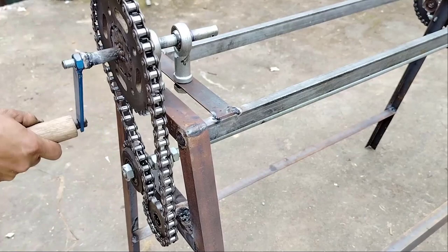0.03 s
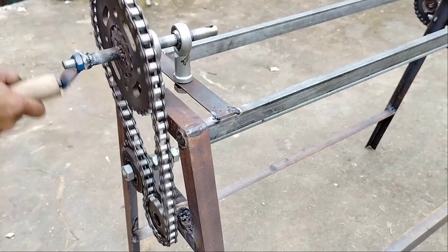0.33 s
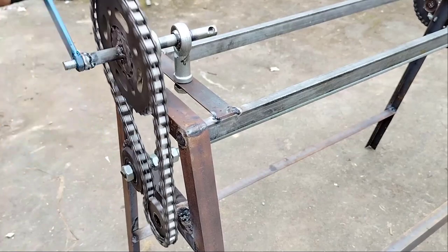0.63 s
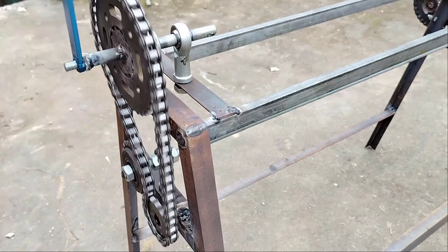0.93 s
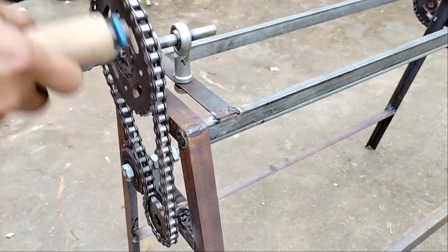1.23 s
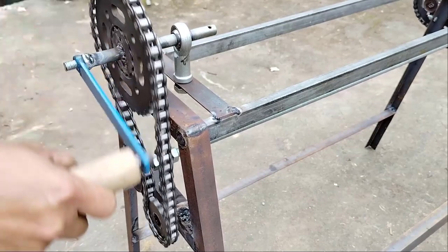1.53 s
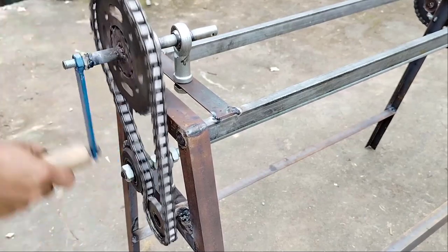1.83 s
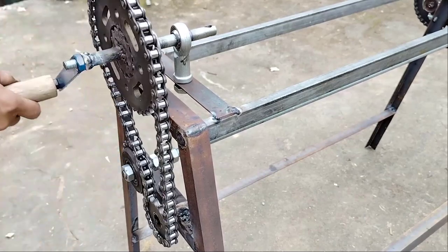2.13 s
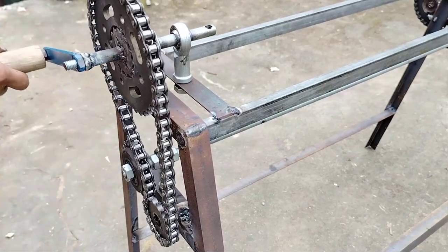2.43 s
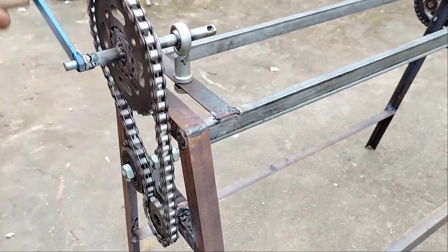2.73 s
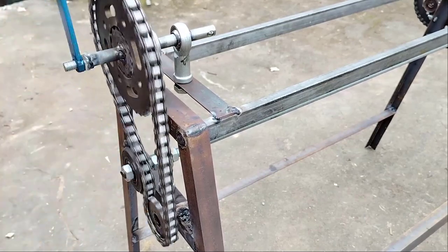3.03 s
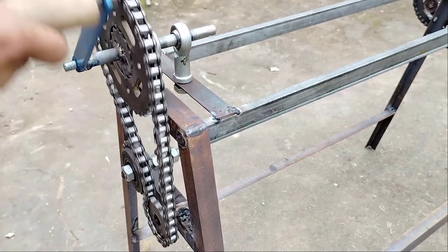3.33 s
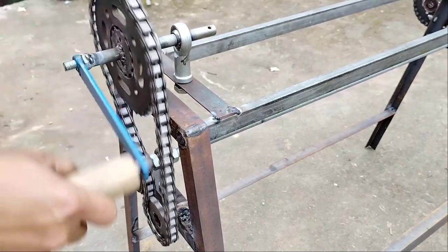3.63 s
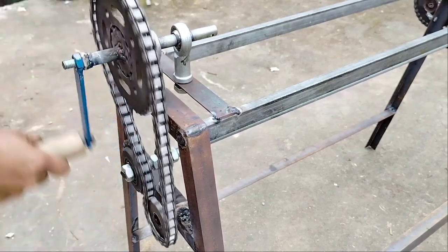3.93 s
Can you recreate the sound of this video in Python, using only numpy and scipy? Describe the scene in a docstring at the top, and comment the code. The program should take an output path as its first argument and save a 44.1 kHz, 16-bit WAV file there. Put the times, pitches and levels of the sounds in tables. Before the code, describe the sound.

A hand-cranked metal chain rattles over a sprocket, clicking and clanking, with one brief pause.

```python
"""A clank, then the close rattle of a slack roller chain, hand-cranked over a sprocket in a workshop.
Impacts excite the resonances of the welded steel frame: rollers rattle, links click onto the teeth,
and the slack snaps tight and jolts the frame. Dry steel squeaks by stick-slip friction.
Near t = 2 s the crank rests briefly, then jerks on again. Faint air noise and a low hum lie beneath."""
import sys
import numpy as np
from scipy import signal
from scipy.fft import rfft, irfft, next_fast_len
from scipy.io import wavfile
from scipy.ndimage import uniform_filter1d, map_coordinates

SR = 44100
rng = np.random.default_rng(int(sys.argv[2]) if len(sys.argv) > 2 else 0)


def wav_record(signal):
    """Record a signal, one row per channel, as 16-bit PCM in the file named by sys.argv[1]."""
    frames = np.transpose(np.atleast_2d(signal))
    bounded = np.clip(frames, -1, 1)
    # unit amplitude maps onto the largest positive 16-bit level
    quanta = np.round(bounded * 32767).astype(np.int16)
    wavfile.write(sys.argv[1], SR, quanta)


N = 176400
TIME = np.arange(N) / SR
LINKS_PER_S, ROLLER_SWING_DB = 40, 3.5

# Spectral envelopes of the steel's four registers: f/Hz, relative level/dB
BASS_SPECTRUM = [(110, -12), (175, -2.5), (275, -1), (370, -7.5), (550, -5), (1500, -25.5), (5000, -92)]
MIDDLE_SPECTRUM = [(100, -24), (400, -14), (750, -6), (1600, -3.5), (2050, 0.5), (3500, 2), (6500, -13.5),
                   (14000, -47)]
TREBLE_SPECTRUM = [(500, -39), (3000, -9), (6300, 3.5), (8500, -1.5), (9800, -7.5), (11500, -2.5),
                   (16000, -7)]
SHEEN_SPECTRUM = [(6000, -23), (12000, -5)]
# Gains of the rattle and of the blows, bass to sheen: gain/dB
RATTLE_GAINS = [-5, 2.42, 0.5, -3]
BLOW_GAINS = [4, 0.5, 1, 1]
def chain():
    """Incoherent sources add in power: rattle and blows together drive each register of the steel."""
    middle, treble = clicks() + clanks()
    blows = (jolts(), middle, treble, pin_ticks())
    spectra = (BASS_SPECTRUM, MIDDLE_SPECTRUM, TREBLE_SPECTRUM, SHEEN_SPECTRUM)
    out = 0
    for run, run_db, hit, hit_db, spectrum in zip(rattle(), RATTLE_GAINS, blows, BLOW_GAINS, spectra):
        force = np.sqrt(amp(run_db) ** 2 * run + amp(hit_db) ** 2 * hit)
        out += steel(force, spectrum)
    return out

# Envelope of the running chain: t/s, relative level/dB
RATTLE_LEVEL = [(.06, -42.5), (.25, -40.5), (.42, -42), (.66, -37), (.85, -33.5), (.9, -38), (1.04, -36.5),
                (1.17, -44.5), (1.3, -33), (1.47, -36.5), (1.68, -37), (1.78, -67.5), (1.89, -46),
                (2.04, -64.5), (2.18, -75), (2.22, -40.5), (2.48, -40), (2.6, -32), (2.79, -41.5),
                (2.83, -33.5), (2.94, -38.5), (3.06, -37), (3.16, -30), (3.35, -23.5), (3.52, -34.5),
                (3.62, -32.5), (3.76, -40.5), (3.88, -33.5), (4, -26.5)]
def rattle():
    """Many small impacts merge into a rattle; returns its power in the four registers."""
    level_db = np.interp(TIME, *np.transpose(RATTLE_LEVEL))
    rolling = contacts(per_s=2200, spread_db=6.5, swing_db=ROLLER_SWING_DB)
    treble, sheen = (contacts(per_s=2000, spread_db=-2, swing_db=5.5) for _ in range(2))
    return amp(level_db) ** 2 * np.array([rolling, rolling, treble, sheen])

def contacts(per_s, spread_db, swing_db, decay_s=0.0019):
    """Shot noise: the power of random roller contacts, swelling link by link, with mean 1."""
    scatter_db = spread_db * np.clip(rng.standard_normal(N), -2, 2)
    link_db = swing_db * np.clip(wobble(LINKS_PER_S), -2, 2)
    hits = (rng.random(N) < per_s / SR) * amp(scatter_db + link_db) ** 2
    power = signal.lfilter([1], [1, -np.exp(-2 / (decay_s * SR))], hits)
    return power / power.mean()

# Links seating on the teeth: t/s, relative middle level/dB, relative treble level/dB
LINK_CLICKS = [(0.232, -32.5, -35), (0.489, -30, -19.5), (.582, -43, -23.5), (0.736, -27.5, -40),
               (0.795, -33, -37), (.824, -29, -25), (.998, -32.5, -19), (1.304, -27.5, -23),
               (1.36, -24.5, -25), (1.52, -32, -20.5), (1.625, -32, -23), (1.954, -41.5, -36),
               (2.29, -23, -43), (2.346, -24.5, -23), (2.513, -30.5, -22), (2.624, -34, -24),
               (2.68, -28, -31), (2.886, -30.5, -20), (3.368, -21.5, -13.5), (3.583, -23.5, -17),
               (3.597, -29.5, -17), (3.697, -26, -19.5), (3.976, -23.5, -23)]
CLICK_RISE_S, CLICK_FALL_S = 0.0006, 0.0045
def clicks():
    """Impact of link on tooth: middle and treble power, the treble damped sooner."""
    middle = sum(blow(TIME - s, db, rise_s=0.0035, fall_s=0.0099) for s, db, _ in LINK_CLICKS)
    treble = sum(blow(TIME - s, db, CLICK_RISE_S, CLICK_FALL_S) for s, _, db in LINK_CLICKS)
    return np.array([middle, treble])

# Slack snapping tight: t/s, relative middle level/dB, relative treble level/dB, rise/s, ring f/Hz
SLACK_CLANKS = [(.061, -33.5, -29.5, 0.00085, 895), (0.957, -22, -24, 0.014, 3200),
                (1.08, -22.5, -20, 0.0076, 2100), (1.202, -20.5, -14.5, 0.00086, 3900),
                (1.859, -28.5, -33.5, 0.0085, 3140), (2.211, -16.5, -15, 0.0054, 2093),
                (2.3627, -12.5, -9.5, 0.0014, 2380), (2.376, -21.5, -27, 0.0036, 843),
                (2.9781, -22, -13, 0.0023, 3030), (3.111, -18, -15, 0.0015, 2050),
                (3.223, -11.5, -15.5, 0.0012, 2016), (3.246, -14.5, -26, 0.0025, 1300),
                (3.32, -16.5, -16.5, 0.0044, 7700)]
def clanks():
    """Sudden tension acts as an impulse on the chain; returns middle and treble power."""
    middle = sum(blow(TIME - s, db, rise, fall_s=0.015) for s, db, _, rise, _ in SLACK_CLANKS)
    treble = sum(blow(TIME - s, db, rise, fall_s=0.0068) for s, _, db, rise, _ in SLACK_CLANKS)
    return np.array([middle, treble])

# Jolts of the frame: t/s, relative level/dB
FRAME_JOLTS = [(.061, -31.5), (0.737, -27), (1.08, -25), (1.214, -28.5), (2.237, -30), (2.374, -25.5),
               (2.456, -29), (2.515, -29), (3.117, -28.5), (3.186, -28), (3.236, -23), (3.326, -26.5),
               (3.614, -48), (3.935, -31)]
JOLT_RISE_S = 0.0048
def jolts():
    """Reaction to the slack chain shakes the frame; returns bass power."""
    return sum(blow(TIME - s, db, JOLT_RISE_S, fall_s=0.016) for s, db in FRAME_JOLTS)

# Thin ticks of the link pins: t/s, relative level/dB
PIN_STRIKES = [(.129, -28.5), (.215, -26), (0.673, -26), (.957, -20), (1.075, -16), (1.288, -24),
               (1.358, -19), (2.208, -16), (2.59, -23), (3.08, -23), (3.421, -21.5)]
def pin_ticks():
    """Brief contacts excite high frequencies; returns the pins' power in the sheen register."""
    return sum(blow(TIME - s, db, CLICK_RISE_S, CLICK_FALL_S) for s, db in PIN_STRIKES)

# Modes of frame and sprocket: f/Hz, bandwidth/Hz, level relative to the broad response/dB
STEEL_MODES = [(170.6, 22, 4), (215, 45, -0.5), (278, 32, 2.5), (445.4, 40, 9.5), (914, 136, 0),
               (1294, 32, -1.5), (1427, 32, -2.5), (1970, 110, 1), (2950, 7.1, 4)]
def steel(force, spectrum, size=16384, count=28):
    """Modal superposition: noise shaped by a force envelope rings on in the steel's resonances."""
    hz = np.fft.rfftfreq(size, 1 / SR)
    cepstrum = irfft(np.log(amp(along(spectrum, hz))))
    broad = np.exp(rfft(2 * cepstrum[:size // 2], size))  # minimum phase
    low_hz, high_hz, width_hz, lesser_db = 549, 2685, 9.6, 0.5  # the welded frame's lesser modes
    centres = low_hz + (high_hz - low_hz) * (np.arange(count) + rng.random(count)) / count
    modes = STEEL_MODES + [(f, width_hz, lesser_db) for f in centres]
    rings = 1 + sum(amp(db) * 1j * hz * w / (f * f - hz * hz + 1j * hz * w) for f, w, db in modes)
    response = irfft(broad * rings)
    drive = force * link_colour(spread(noise_pair()))
    return signal.fftconvolve(drive, response[None] / np.linalg.norm(response), axes=1)[:, :N]

def link_colour(x, swing_db=2.5, corner_hz=980):
    """Spectral modulation: each link has a colour of its own, while the frame's bass stays."""
    hz, _, spectra = signal.stft(x, SR, nperseg=512)
    field = uniform_filter1d(rng.standard_normal(spectra.shape[1:]), size=5, axis=0)
    field = np.clip(unit(uniform_filter1d(field, size=6, axis=1)), -2, 2)
    depth_db = swing_db * hz ** 2 / (hz ** 2 + corner_hz ** 2)
    return unit(signal.istft(spectra * amp(depth_db[:, None] * field), nperseg=512)[1][:, :N])

def link_rings(count=4, detune=0.06, lowest_hz=1900, scatter_octaves=0.7):
    """Damped free vibration: each clanking, clicking or passing link rings in a few close partials."""
    passing = rng.uniform(0, N / SR, int(LINKS_PER_S * N / SR))
    passing_db = np.interp(passing, *np.transpose(RATTLE_LEVEL)) + rng.normal(0, 3, len(passing))
    light = [(s, db + 1) for s, db, _ in LINK_CLICKS] + list(zip(passing, passing_db))
    links = [(s, db - 2, rise, hz) for s, db, _, rise, hz in SLACK_CLANKS]
    for s, db in light:
        links.append((s, db, CLICK_RISE_S, lowest_hz * 2 ** (scatter_octaves * abs(rng.normal()))))
    out = np.zeros((2, N))
    for s, db, rise, pitch_hz in links:
        near = np.abs(TIME - s) < .08
        partials = pitch_hz * np.exp(detune * rng.standard_normal(count))
        ring = sum(np.sin(2 * np.pi * (hz * TIME[near] + rng.random((2, 1)))) for hz in partials)
        out[:, near] += unit(ring) * np.sqrt(blow(TIME[near] - s, db, rise, fall_s=0.012))
    return spread(out)

# A tooth takes up the load: t/s, relative level/dB
TOOTH_LOADS = [(.063, -30.5), (.55, -33), (.64, -33.5), (.784, -31), (.869, -30.5), (1.009, -27.5),
               (1.963, -37.5), (2.292, -23.5), (3.17, -25.5), (3.28, -26.5), (3.88, -30)]
def sprocket(mode_hz=449, waver_rad=0.45):
    """Sudden loading excites one mode of the wheel, roughened by amplitude and phase modulation."""
    power = sum(blow(TIME - s, db, JOLT_RISE_S, fall_s=0.051) for s, db in TOOTH_LOADS)
    shake = amp(ROLLER_SWING_DB * wobble(2 * LINKS_PER_S))
    phase = 2 * np.pi * mode_hz * TIME + waver_rad * wobble(2 * LINKS_PER_S)
    return np.sqrt(power) * shake * np.sin(phase)

# Dry steel slipping: t/s, duration/s, start f/Hz, end f/Hz, level/dB
STEEL_SQUEAKS = [(0.259, 0.037, 7010, 6210, -26.5), (0.315, 0.038, 4450, 5590, -31.5),
                 (0.345, 0.051, 4260, 4320, -24), (2.899, 0.102, 750, 607, -37)]
def squeaks(roughness=0.054, wavers_per_s=1500):
    """Stick-slip friction sustains short, rough tones that glide in pitch."""
    out = np.zeros((2, N))
    for s, length, start_hz, end_hz, db in STEEL_SQUEAKS:
        progress = np.clip((TIME - s) / length, 0, 1)
        waver = 1 + roughness * np.array([wobble(wavers_per_s), wobble(wavers_per_s)])
        hz = (start_hz + (end_hz - start_hz) * progress) * waver
        out += amp(db) * np.sin(np.pi * progress) * np.sin(2 * np.pi * np.cumsum(hz, axis=1) / SR)
    return spread(np.sqrt(2) * out)

# Reverberation time of the workshop: f/Hz, T60/s
ROOM_DECAY = [(200, 0.24), (530, 0.13), (1400, 0.18), (10000, 0.13)]
def room(x, count=4, build_s=0.0016):
    """Diffuse reverberation: short random tails crossfade in turn, so the room rings at no fixed pitch."""
    out = 0
    for k in range(count):
        hz, t, spectra = signal.stft(spread(noise_pair())[:, :SR // 2], SR, nperseg=256)
        decay = amp(-60 * t / along(ROOM_DECAY, hz)[:, None])
        tail = signal.istft(spectra * decay * (1 - np.exp(-t / build_s)), SR, nperseg=256)[1]
        share = np.maximum(np.cos(2 * np.pi * (2 * TIME - k / count)), 0)
        out += signal.fftconvolve(x * share, tail / np.linalg.norm(tail[0]), axes=1)[:, :N]
    return out

# Spectrum of the workshop air: f/Hz, relative level/dB
AIR_SPECTRUM = [(20, -24), (60, 1.5), (130, 4), (1000, -17.5), (2700, -22), (4700, -12.5), (11000, -24.5),
                (16000, -57)]
def background(air_db=-46.5, hum_db=-53, hum_hz=76):
    """Ambient noise: broadband workshop air and a faint, slightly wavering hum."""
    air = unit(filtered(spread(noise_pair()), lambda hz: amp(along(AIR_SPECTRUM, hz))))
    hum = np.sqrt(2) * np.sin(2 * np.pi * hum_hz * np.cumsum(1 + 0.0054 * wobble(7.5)) / SR)
    return amp(air_db) * air + amp(hum_db) * hum

# Likeness of left and right: f/Hz, correlation coefficient
STEREO_CORRELATION = [(290, 0.95), (640, 0.69), (1400, 0.31), (3100, -0.46), (7000, 0.081)]
def spread(pair):
    """Sum and difference of two independent signals give left and right, correlated in the bass."""
    turn = lambda hz: np.arccos(np.clip(along(STEREO_CORRELATION, hz), -1, 1)) / 2
    mid, side = filtered(pair, lambda hz: np.array([np.cos(turn(hz)), np.sin(turn(hz))]))
    return np.array([mid + side, mid - side])

def blow(t, db, rise_s, fall_s):
    """Exponential rise and decay: power at time t from the peak, given 1/e amplitude times."""
    return amp(db) ** 2 * np.exp(-2 * np.minimum(np.maximum(-t / rise_s, t / fall_s), 20))

def amp(db):
    """Decibels to amplitude ratio."""
    return 10 ** (np.asarray(db) / 20)

def unit(x):
    """Normalisation to rms 1."""
    return x / np.sqrt(np.mean(x ** 2) + 1e-20)

def along(points, hz):
    """Interpolation of (f/Hz, value) points on a logarithmic axis."""
    f, v = np.transpose(points)
    return np.interp(np.log(hz + 1), np.log(f + 1), v)

def noise_pair():
    """Two independent white noises."""
    return rng.standard_normal((2, N))

def wobble(knots_per_s):
    """Smooth random modulation: a spline through Gaussian knots."""
    return map_coordinates(rng.standard_normal(N // 8), [TIME * knots_per_s], mode="wrap")

def filtered(x, response):
    """Linear filtering: the spectrum of x times a frequency response."""
    size = next_fast_len(N + SR // 2)
    return irfft(rfft(x, size) * response(np.fft.rfftfreq(size, 1 / SR)), size)[..., :N]

# Stereo balance of the drive: f/Hz, left minus right level/dB
DRIVE_BALANCE = [(5500, -0.57), (8000, -2.5), (12000, 0.5)]
def scene(room_db=-4.5):
    """Superposition of the chain drive, its reverberation, the sprocket and the background."""
    drive = chain() + link_rings() + squeaks()
    drive = drive + amp(room_db) * room(drive)
    drive = filtered(drive, lambda hz: amp(along(DRIVE_BALANCE, hz) * np.array([[.5], [-.5]])))
    return drive + sprocket() + background()

def record(dry, start_s=0.0596, fade_s=0.0014, cutoff_hz=16000):
    """Gating and band limiting: a moment of silence, then the sound, clipped and steeply low-passed."""
    gate = np.clip((TIME - start_s) / fade_s, 0, 1)
    return filtered(np.clip(dry * gate, -1, 1), lambda hz: 1 / np.sqrt(1 + (hz / cutoff_hz) ** 200))

dry = scene()
out = record(dry)
wav_record(out)
```